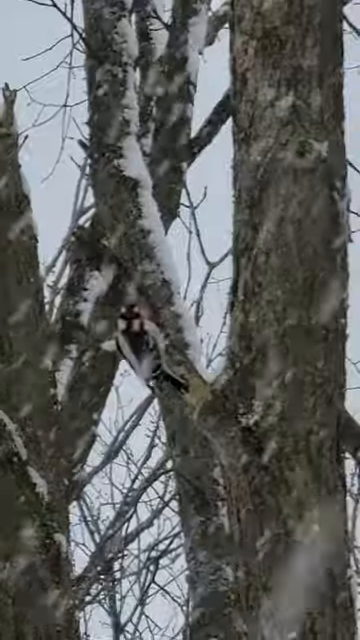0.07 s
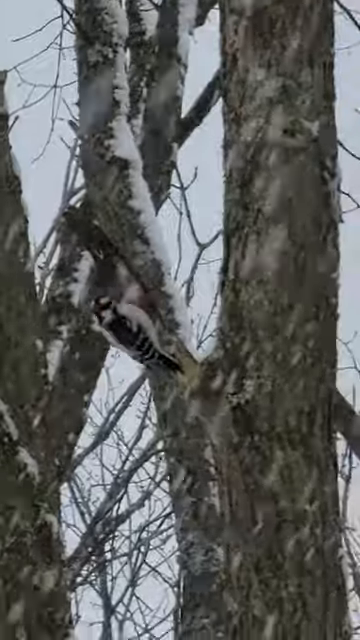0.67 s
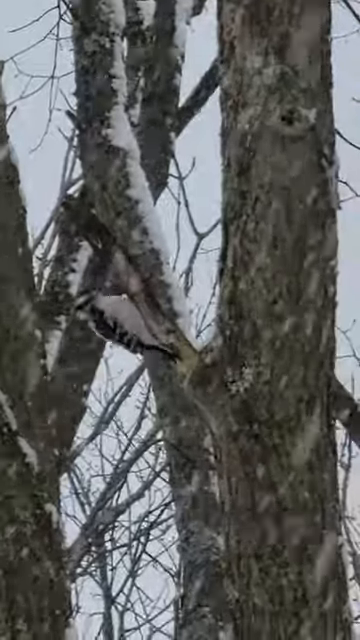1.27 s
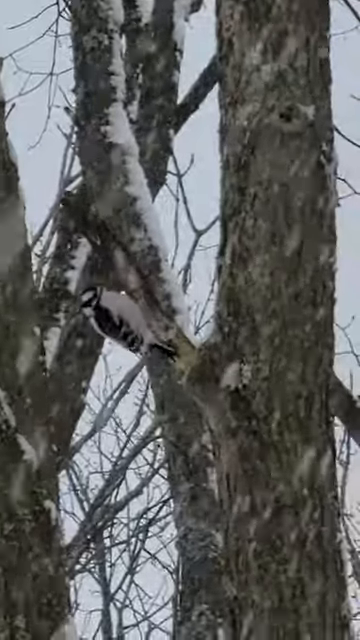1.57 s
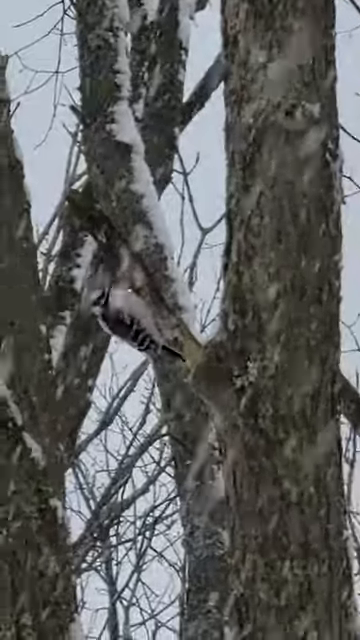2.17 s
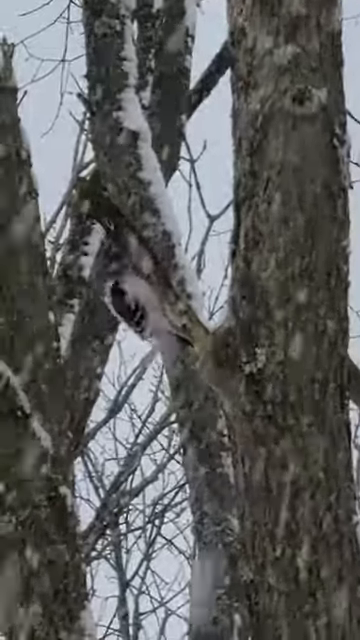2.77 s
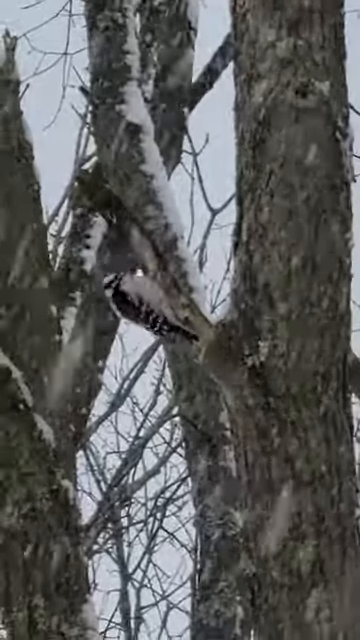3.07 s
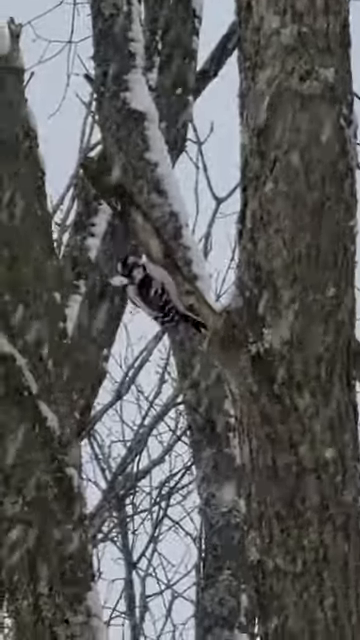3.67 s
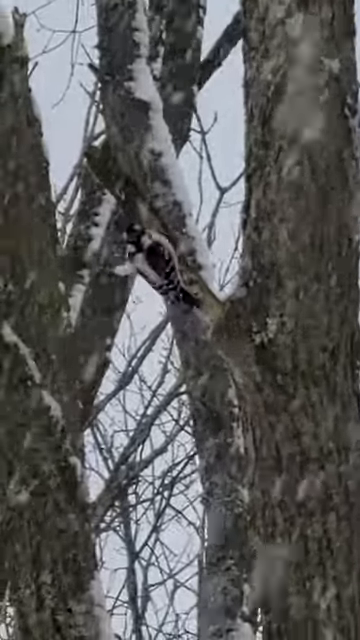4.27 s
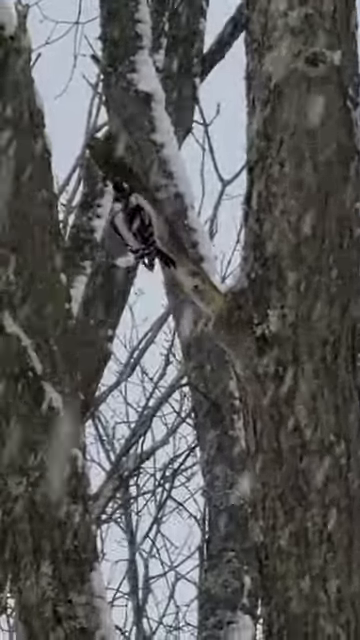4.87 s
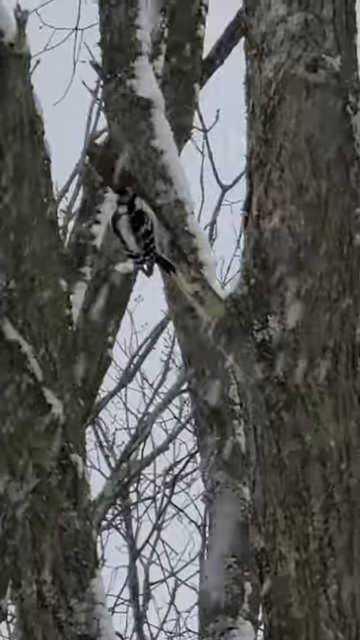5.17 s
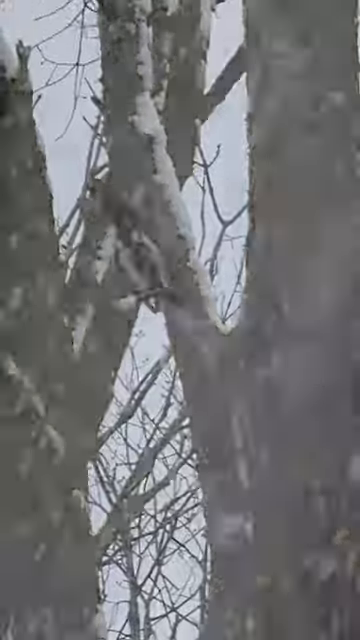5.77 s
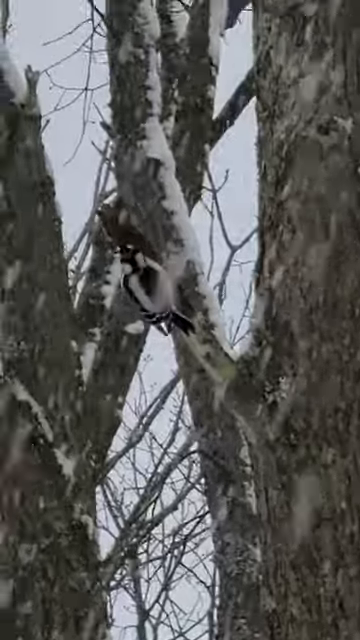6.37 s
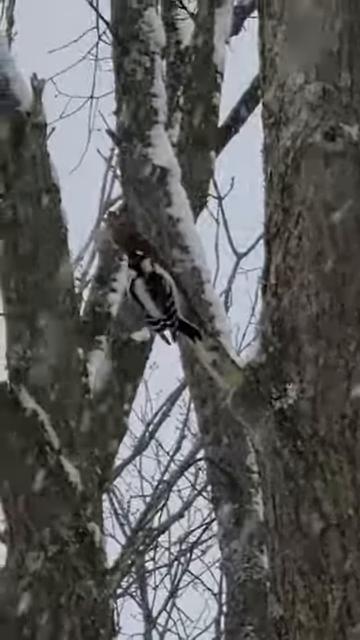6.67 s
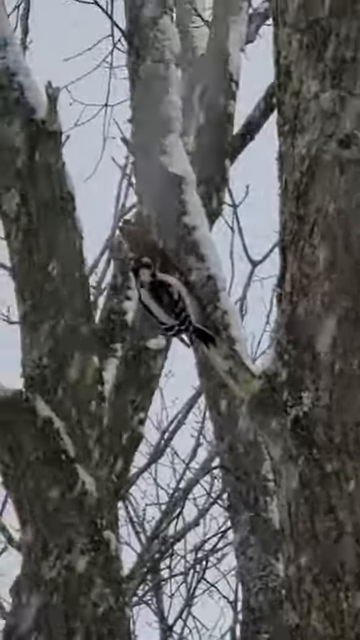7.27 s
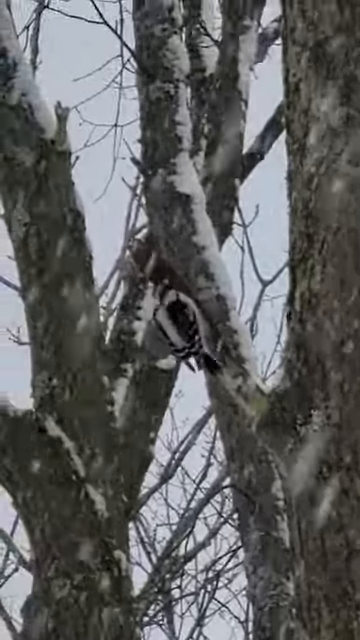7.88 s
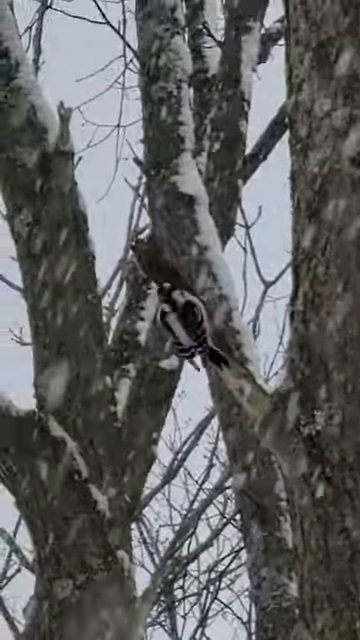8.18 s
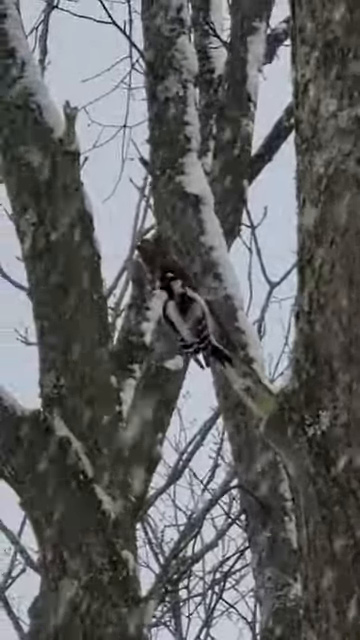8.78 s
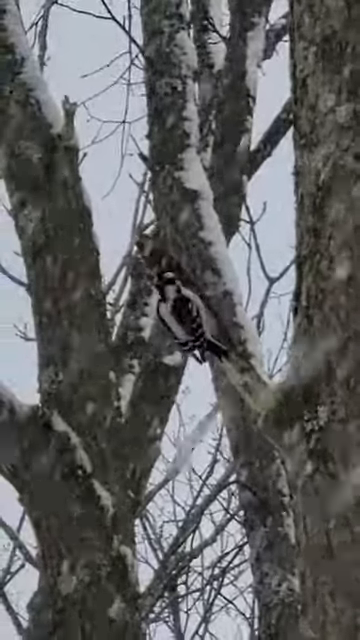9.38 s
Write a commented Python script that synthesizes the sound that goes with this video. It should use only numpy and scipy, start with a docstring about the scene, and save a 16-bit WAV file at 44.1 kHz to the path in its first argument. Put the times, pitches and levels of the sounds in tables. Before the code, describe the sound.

In a quiet snowy wood, wind rumbles on the microphone over a soft hush of air. A small woodpecker knocks unevenly on a dead limb while thin, rising chirps scatter among the trunks. The pecking stops, and distant birds whistle among soft rustles. Snow grains tick on the microphone and one clump bumps it. The breeze grows gustier, claws scratch faintly on bark, and two faint pecks and a last chirp follow.

```python
"""A snowy wood: from the start, wind rumbles on the microphone's ports over a soft hush of air.
Almost at once a small woodpecker knocks on a dead limb, birds give thin, rising chirps that scatter
among the trunks, and snow grains tick on the microphone. From four seconds on, far birds whistle
among soft rustles; at five a clump of snow bumps the casing. The breeze freshens, claws scratch
on bark, and two faint pecks and a last chirp follow as the wind eases."""
import sys
import numpy as np
from scipy import signal
from scipy.fft import rfft, irfft
from scipy.io import wavfile
from scipy.ndimage import uniform_filter1d

SR = 44100
rng = np.random.default_rng(int(sys.argv[2]) if len(sys.argv) > 2 else 0)


def generate_wav(sig):
    """Save sig (samples, or channels by samples) to the path in sys.argv[1] as 16-bit PCM at SR."""
    pcm = np.round(np.clip(np.atleast_2d(sig).T, -1, 1) * 32767).astype(np.int16)
    wavfile.write(sys.argv[1], SR, pcm)


N = 419832
T = np.arange(N) / SR


def undb(db):
    """Decibels to gain."""
    return 10 ** (np.asarray(db) / 20)


def unit(x):
    """Scale to rms 1."""
    return x / np.sqrt(np.mean(x ** 2))


def automation(rows):
    """Join (t/s, value, ..) breakpoints by straight lines, one curve per value column."""
    s, *columns = np.transpose(rows)
    return [np.interp(T, s, column) for column in columns]


def eq(x, points):
    """Shape x with an EQ curve of (f/Hz, gain/dB) points."""
    hz, db = np.transpose(points)
    f = np.maximum(np.fft.rfftfreq(x.shape[-1], 1 / SR), 1)
    return irfft(rfft(x) * undb(np.interp(np.log(f), np.log(hz), db)), x.shape[-1])


def drift(rate_hz, size):
    """Smooth random modulation with a spread near 1."""
    k = max(int(SR / rate_hz), 1)
    held = np.repeat(rng.standard_normal(size // k + 1), k)
    return np.sqrt(2) * uniform_filter1d(uniform_filter1d(held, k), k)[:size]


def add(out, s, sound, pan_db):
    """Mix a sound in at time s; pan is always left minus right."""
    i = max(int(s * SR), 0)
    both = sound * undb(np.array([[pan_db], [-pan_db]]) / 2)
    out[:, i:i + both.shape[1]] += both[:, :N - i]


def decay(t, t60):
    """Exponential decay, 60 dB down after t60."""
    return np.exp(-np.log(1000) * t / t60)


def ring(modes, t, detune, stretch):
    """One decaying sine per mode, with random detuning and polarity at every hit."""
    hz, db, t60 = np.transpose(modes)[:, :, None]
    hz = hz * (1 + detune * rng.standard_normal(hz.shape))
    return undb(db) * decay(t, t60 * stretch) * np.sin(2 * np.pi * hz * t) * rng.choice([-1, 1], hz.shape)


def stereo_noise(correlation):
    """Mid/side white noise; more correlation narrows the image."""
    mid, side = rng.standard_normal((2, N))
    return np.sqrt(1 + correlation) * mid + np.sqrt(1 - correlation) * side * np.array([[1], [-1]])


def off_axis(x, samples):
    """Sound from one side reaches the left port a few samples late."""
    return np.array([np.roll(x[0], samples), x[1]])


def trunks(x, t60, wet_db, lumpy_db, build_s):
    """Reverb return of many trunks: uneven echoes, unrelated left and right, that build and die away."""
    t = np.arange(SR // 2) / SR
    lumps = undb(lumpy_db * np.array([drift(250, len(t)), drift(250, len(t))]))
    echoes = rng.standard_normal((2, len(t))) * lumps
    echoes *= decay(t, t60) * (1 - np.exp(-t / build_s))
    echoes *= undb(wet_db) / np.sqrt(np.sum(echoes ** 2, axis=1, keepdims=True))
    return signal.fftconvolve(x.mean(0)[None], echoes, axes=1)[:, :N]


def rub(half_s, band, grain_db):
    """Grainy noise that swells for half_s and sinks for as long."""
    u = np.linspace(-1, 1, int(2 * half_s * SR))
    noise = unit(eq(rng.standard_normal((2, len(u))), band))
    return noise * undb(grain_db * drift(200, len(u))) * np.cos(np.pi * u / 2) ** 2


# tone of the air bed: f/Hz, gain/dB
HUSH_EQ = [(30, 1.5), (140, -0.5), (250, -3.5), (400, -10.5), (650, -14), (1000, -23), (1600, -29.5),
           (3000, -29), (4500, -39), (7300, -39.5), (8300, -54.5), (10800, -47.5), (12500, -40.5),
           (16000, -42.5)]
# fader ride on the whole bed: t/s, level/dB
HUSH_RIDE = [(0.1, -53.5), (1.4, -54), (3.9, -53), (4.8, -54), (6.1, -53), (7.4, -54), (9.5, -54)]
# trim of the hiss against the murmur: t/s, gain/dB
HISS_TRIM = [(0.1, 0.5), (1.4, 3), (3.9, 1), (4.6, 1), (7, 1), (9.5, 0.5)]


def hush(sway_db=1.0, split_hz=800, hiss_pan_db=-2):
    """Air moving through the bare wood: a deep, centred murmur under a wide, smooth hiss."""
    murmur = signal.sosfilt(signal.butter(2, split_hz, fs=SR, output="sos"), stereo_noise(0.85))
    hiss = signal.sosfilt(signal.butter(2, split_hz, "high", fs=SR, output="sos"), stereo_noise(0.0084))
    murmur *= undb(sway_db * drift(8.2, N))
    hiss *= undb(automation(HISS_TRIM)[0] + np.array([[hiss_pan_db], [-hiss_pan_db]]) / 2)
    bed = unit(eq(off_axis(murmur, samples=12) + hiss, HUSH_EQ))
    return bed * undb(automation(HUSH_RIDE)[0])


# tone of the buffeting: f/Hz, gain/dB
RUMBLE_EQ = [(12, -12.5), (25, -2), (42, -2), (52, 5), (64, 1.5), (80, 1.5), (105, -11), (150, -11.5),
             (200, -39.5), (300, -48), (600, -50.5), (2000, -106)]
# the breeze, with an early lull and freshening later: t/s, level/dB, pan/dB
BREEZE = [(0.1, -48.5, -1), (0.52, -44, -7), (0.72, -52.5, -1), (1.47, -56.5, -2), (1.65, -46.5, 4.5),
          (3.1, -52.5, 13.5), (3.45, -54.5, 18), (4.0, -44.5, 10), (4.45, -49, 4), (5.4, -47, 9),
          (6.35, -42, 9.5), (6.7, -38.5, 1), (7.25, -43.5, -2), (8.25, -40, -3.5), (8.75, -47, -3),
          (9.5, -49.5, 9)]
# gusts riding on the breeze: crest t/s, length/s, lift/dB
GUSTS = [(0.37, 0.037, 11), (3.06, 0.14, 7), (4.196, 0.037, 13), (5.547, 0.085, 8), (5.879, 0.025, 13),
         (6.694, 0.052, 8), (6.843, 0.11, 8.5), (7.376, 0.074, 16.5), (7.561, 0.03, 15.5),
         (7.84, 0.15, 11.5), (8.494, 0.11, 12), (9.206, 0.15, 10)]


def wind(trim_db=1, leveller_s=0.04, deep_hz=105, eddy_db=1.5, upper_share=.45):
    """Eddies buffet each port in their own way; the breeze sets how hard, and gusts lift the lows most."""
    rumble = off_axis(eq(stereo_noise(0.39), RUMBLE_EQ), samples=16)
    # level the turbulence so that its swells follow the gusts
    rumble /= np.sqrt(uniform_filter1d(np.mean(rumble ** 2, axis=0), int(leveller_s * SR)))
    deep = signal.sosfiltfilt(signal.butter(3, deep_hz, fs=SR, output="sos"), rumble)
    breeze_db, pan_db = automation(BREEZE)
    gusts_db = sum(lift_db * np.exp(-(2 * (T - s) / length) ** 2) for s, length, lift_db in GUSTS)
    gusty = deep * undb(gusts_db) + (rumble - deep) * undb(upper_share * gusts_db)
    eddies = np.array([drift(16, N), drift(14, N)])
    return gusty * undb(breeze_db + trim_db + eddy_db * eddies + np.array([pan_db, -pan_db]) / 2)


# modes of the dead limb, before each hit weights and stretches them: f/Hz, level/dB, t60/s
LIMB_MODES = [(551, -4, 0.073), (712, -17.5, 0.11), (960, -9, 0.017), (1180, -2.5, 0.02), (1307, -9, 0.04),
              (1405, -6, 0.088), (1940, -3.5, 0.028), (2395, -4, 0.065), (2610, -11, 0.022),
              (2790, -3.5, 0.032), (3160, -7.5, 0.024), (4100, -12, 0.026), (5260, -9, 0.0085)]
# beak hits: t/s, thud/dB, hollow knock/dB, bark/dB, splinter/dB, ring stretch/factor, favoured f/Hz
PECKS = [(0.3615, -55, -74, -71.5, -70, 1.2, 2800), (0.497, -56.5, -70.5, -73.5, -64, 1.4, 1960),
         (0.621, -54, -62.5, -63.5, -74, 0.67, 2850), (0.992, -67, -67, -76, -60, 0.72, 1160),
         (1.1162, -65, -67.5, -70.5, -70, 0.78, 734), (1.2332, -67, -68.5, -72.5, -64, .7, 1960),
         (1.344, -63.5, -71, -74, -72, 0.58, 2780), (1.847, -61, -67.5, -70.5, -74, 0.95, 1960),
         (2.086, -61, -61.5, -68.5, -70, 0.89, 1390), (2.337, -61, -67, -72, -56, 0.69, 1160),
         (2.537, -57, -67, -73, -68, 0.83, 2400), (2.782, -55.5, -60.5, -63.5, -68, 1.05, 1340),
         (3.61, -56.5, -68, -73, -63, 1.05, 1960), (3.851, -60, -72, -74.5, -68, 0.68, 2400),
         (4.133, -60, -73, -75, -74, 1.8, 1960), (8.122, -71, -78, -71, -65.5, 0.9, 1960),
         (8.23, -68, -76, -74.5, -72, 1.3, 1980)]


def pecks(ring_db=13, crack_db=5.5, crumbs_db=-24, contact_s=0.00013, spot_db=5, spot_width_hz=150):
    """Each hit rings the limb and cracks bark; the spot struck sets which modes speak and for how long."""
    out, t = np.zeros((2, N)), np.arange(SR // 5) / SR
    zones_hz, modes_hz = [556, 1400, 1950, 2800, 5000], np.array(LIMB_MODES)[:, 0]
    attack = 1 - np.exp(-t / contact_s)  # soft, rotten wood yields for a moment under the beak
    crack = undb(crack_db) * (decay(t, t60=.022) + undb(crumbs_db) * decay(t, t60=.13))
    for s, thud_db, knock_db, bark_db, splinter_db, stretch, spot_hz in PECKS:
        zones_db = [thud_db, knock_db, bark_db, bark_db, splinter_db]
        favoured_db = spot_db * np.exp(-((modes_hz - spot_hz) / spot_width_hz) ** 2)
        modes_db = np.interp(np.log(modes_hz), np.log(zones_hz), zones_db) + favoured_db + ring_db
        wood = undb(modes_db) @ ring(LIMB_MODES, t, detune=.014, stretch=stretch)
        top_end = [(6500, splinter_db + 5), (9000, splinter_db - 10)]
        bark = eq(rng.standard_normal((2, len(t))), [(150, thud_db), *zip(zones_hz, zones_db), *top_end])
        add(out, s, attack * (wood + bark * crack), pan_db=-4.5)
    return off_axis(out, samples=2) + trunks(out, t60=0.25, wet_db=-7, lumpy_db=3, build_s=0.0013)


# pitch and level envelope of a chirp's rise: time/share of rise, pitch/share of span, gain/dB
CHIRP_SHAPE = [(0, 0, -7), (.14, .34, -2), (.4, .56, -3), (.64, .79, -3), (.83, .88, -5), (.93, .96, -8),
               (1, 1, -11)]
# tone of what the trunks send back: f/Hz, gain/dB
ECHO_EQ = [(5500, 7.5), (7000, -3.5), (8300, -1), (12000, 8), (16000, -7)]
# chirp cues: t/s, rise/s, start f/Hz, top f/Hz, level/dB, swell/dB, overtone/dB, echo send/dB, pan/dB
CHIRPS = [(0.5103, 0.047, 5660, 8270, -48.5, 9.5, -18, -2, 14),
          (1.0192, 0.043, 5400, 7880, -46.5, 18, -16, -6.5, 9.5),
          (2.2255, 0.045, 5660, 8120, -37.5, 7, -17, -14, 0.5),
          (2.716, 0.036, 5400, 7420, -66.5, -3, -22, -5, 0),
          (3.461, 0.047, 5380, 8090, -41.5, 10.5, -8, -8.5, -8),
          (5.67, 0.035, 5220, 7280, -52, -9, -28, -22.5, -6),
          (8.9853, 0.032, 5340, 7270, -55, -6, -41, -17.5, -3)]


def chirps(flick_s=0.0073, flick_hz=2150, flick_db=-8, attack_s=0.0022,
           waver=0.0073, flutter_db=1.0, rasp_db=-25, overtone_swell_db=4):
    """A slightly raspy whistle leaps up, climbs more slowly, then flicks down as the syrinx lets go."""
    out, send = np.zeros((2, 2, N))
    when, climb, contour_db = np.transpose(CHIRP_SHAPE)
    for s, rise, start_hz, top_hz, db, swell_db, overtone_db, send_db, pan_db in CHIRPS:
        t = np.arange(int((rise + flick_s) * SR)) / SR
        up, down = np.minimum(t / rise, 1), np.maximum(t - rise, 0) / flick_s
        hz = start_hz + (top_hz - start_hz) * np.interp(up, when, climb) - flick_hz * down
        phase = 2 * np.pi * np.cumsum(hz * (1 + waver * drift(370, len(t)))) / SR
        gate = np.clip(t / attack_s, 0, 1) * np.clip((1 - down) * 4, 0, 1)
        envelope_db = np.interp(up, when, contour_db) + swell_db * (t / rise - .5) + flick_db * down
        gain = undb(db + envelope_db + flutter_db * drift(206, len(t)))
        rasp = 1 + undb(rasp_db) * drift(600, len(t))
        overtone = undb(overtone_db + overtone_swell_db * (up - 1)) * np.sin(2 * phase)
        note = np.sqrt(2) * gate * gain * rasp * (np.sin(phase) + overtone)
        add(out, s, note, pan_db)
        add(send, s, note * undb(send_db), pan_db=0)  # a bird farther off or facing away is wetter
    twigs = trunks(out, t60=0.12, wet_db=-11.5, lumpy_db=2, build_s=0.005)
    wood = trunks(eq(send, ECHO_EQ), t60=0.4, wet_db=1.0, lumpy_db=5, build_s=.014)
    return off_axis(out, samples=7) + twigs + wood


# tone of the casing's dull knock: f/Hz, gain/dB
CASING_EQ = [(200, -35.5), (800, 13), (1400, 1.5), (1950, 20.5), (2400, 10.5), (3400, 15), (5000, -1),
             (7200, 3), (8500, -39), (16000, -55)]
# tone of a grain's sizzle: f/Hz, gain/dB
SIZZLE_EQ = [(1000, -8), (4000, -13), (7000, -10), (9500, -10), (12500, 1), (15000, -1), (17000, -36.5)]
# larger grains hitting the microphone: t/s, knock/dB, sizzle/dB, pan/dB, ring f/Hz
GRAINS = [(0.772, -76, -76, -4, 2800), (2.364, -70.5, -62, -11, 2010), (2.5515, -72, -63, -10, 1700),
          (5.3045, -65.5, -43.5, 0.5, 1850), (5.5157, -84, -69, -10, 2000), (5.6174, -62.5, -58, -4, 2000),
          (6.1609, -77, -72, -17, 2780), (6.4214, -75.5, -75, -12, 3200), (6.5225, -73, -68, -9, 1400),
          (7.168, -73, -90, -1, 2780), (7.6104, -84, -66, 9, 2800), (7.8203, -81, -65, -13, 2800),
          (8.0465, -73, -64, -10, 3500), (8.1052, -76, -69, -5, 2100), (8.5358, -76, -68, -9.5, 2800),
          (8.561, -78, -73, -8, 3400), (8.705, -77, -78, -7, 2800), (8.766, -74, -76, -5, 2600),
          (9.293, -74, -69, -9, 2200), (9.4015, -77, -72, -8, 4800), (9.509, -74, -76, -6, 2300)]


def snow_grains(knock_trim_db=15, sizzle_trim_db=19, fine_db=-90, fine_count=45, landing_s=.0005):
    """Icy grains snap on the casing and crumble; finer ones land at random between them."""
    out, t = np.zeros((2, N)), np.arange(SR // 8) / SR
    fine = [(when * N / SR, fine_db + 8 * weight, fine_db + 12 * bite ** 2, 10 * (side - .5), 2800)
            for when, weight, bite, side in rng.random((fine_count, 4))]
    for s, knock_db, sizzle_db, pan_db, ring_hz in [*GRAINS, *fine]:
        crumbs = undb(-26 + 1.5 * drift(900, len(t))) * decay(t, t60=.18)  # a quiet, uneven trickle
        force = rng.standard_normal((2, len(t))) * (1 - np.exp(-t / landing_s))
        knock = eq(force * (decay(t, t60=.011) + crumbs), CASING_EQ)
        knock = eq(knock, [(ring_hz * 0.88, 0), (ring_hz, 4), (ring_hz * 1.7, 0)])  # the spot rings
        sizzle = eq(force * (decay(t, t60=.0045) + crumbs), SIZZLE_EQ)
        grain = undb(knock_db + knock_trim_db) * knock + undb(sizzle_db + sizzle_trim_db) * sizzle
        add(out, s, grain * (1 - t / t[-1]), pan_db)
    return out


# distant whistles, one glide a row: t/s, length/s, start f/Hz, middle f/Hz, end f/Hz, level/dB, dry/dB
WHISTLES = [(4.061, 0.11, 924, 924, 957, -63.5, -2), (4.112, 0.12, 5500, 4180, 3720, -72, -6),
            (4.215, 0.025, 3680, 2940, 2170, -58, -5), (5.978, 0.024, 2370, 2440, 2680, -68, -1),
            (5.994, 0.037, 2920, 2665, 2500, -60, -1), (6.041, 0.018, 3680, 3380, 3380, -64, 0),
            (6.06, 0.033, 1930, 2580, 2840, -62.5, -0.5), (6.111, 0.029, 3440, 3390, 3410, -63, -1),
            (6.118, .03, 3210, 2930, 2820, -66, 0), (8.04, 0.13, 3690, 3660, 3770, -70, -3),
            (8.06, .035, 3630, 3200, 3450, -69, -3), (9.088, 0.053, 5650, 5140, 4300, -80, -3),
            (9.314, 0.015, 3180, 3300, 3300, -71, 0)]


def far_birds(waver=0.013):
    """Slurred whistles from far off, blurred by their echoes; some birds are hidden behind trunks."""
    send, direct = np.zeros((2, 2, N))
    for s, length, start_hz, middle_hz, end_hz, db, dry_db in WHISTLES:
        u = np.linspace(0, 1, int(length * SR))
        hz = np.interp(u, [0, .5, 1], [start_hz, middle_hz, end_hz]) * (1 + waver * drift(500, len(u)))
        envelope = undb(db) * np.sqrt(np.abs(np.sin(np.pi * u)))
        note = envelope * np.sin(2 * np.pi * np.cumsum(hz) / SR)
        add(send, s, note, pan_db=0)
        add(direct, s, undb(dry_db) * note, pan_db=-2)
    early = trunks(send, t60=0.051, wet_db=-5, lumpy_db=5, build_s=0.0028)
    tail = trunks(send, t60=0.25, wet_db=-1, lumpy_db=3.5, build_s=0.0076)
    return direct + early + tail


# background rustles: crest t/s, half length/s, band f/Hz, level/dB
RUSTLES = [(4.708, 0.26, 1550, -69), (5.294, 0.19, 1510, -64), (6.019, 0.17, 1360, -65.5),
           (6.758, 0.24, 1480, -67.5), (8.745, 0.09, 2400, -83)]


def rustles():
    """Soft, diffuse rustles swell and sink some way off."""
    out = np.zeros((2, N))
    for s, half_s, hz, db in RUSTLES:
        band = [(hz * 0.56, -30), (hz * 0.64, 0), (hz, -2), (hz * 1.96, -11),
                (hz * 3.4, -30), (hz * 6, -50)]
        add(out, s - half_s, undb(db) * rub(half_s, band, grain_db=1), pan_db=-2)
    return out


# low modes of the casing: f/Hz, level/dB, t60/s
CASING_MODES = [(94, 8.5, 0.073), (240, -10, .025), (415, 3, 0.016), (780, -5, 0.021), (1170, -16, .016)]


def snow_clump(at_s=5.0038, thump_db=-47.5, snap_db=-53.5):
    """A heavier clump of snow lands on the casing: a crisp snap layered over a dull thump."""
    out, t = np.zeros((2, N)), np.arange(SR // 10) / SR
    thump = ring(CASING_MODES, t, detune=.01, stretch=1.0).sum(0)
    burst = rng.standard_normal((2, len(t))) * decay(t, t60=0.0064)
    snap = eq(burst, [(1000, 11), (4000, 1), (7000, -7), (9500, -19), (12500, 4), (16000, -5)])
    add(out, at_s, undb(thump_db) * thump + undb(snap_db) * snap * (1 - t / t[-1]), pan_db=20)
    return out


# claw scrapes: crest t/s, half length/s, level/dB
SCRATCHES = [(7.355, 0.05, -66.5), (8.731, 0.13, -80), (9.276, .08, -74)]


def claws():
    """Claws scrape briefly over the bark, and the trunks add a tail."""
    out = np.zeros((2, N))
    band = [(1000, -25), (1900, -1), (2700, -2), (3300, -13), (4700, -17), (7000, -37)]
    for s, half_s, db in SCRATCHES:
        add(out, s - half_s, undb(db) * rub(half_s, band, grain_db=1.5), pan_db=-4)
    return out + trunks(out, t60=0.5, wet_db=-1, lumpy_db=0, build_s=.01)


def scene():
    """The mix: a bed of air and wind under the birds, snow and rustles."""
    bed = hush() + wind()
    return bed + pecks() + chirps() + snow_grains() + far_birds() + rustles() + snow_clump() + claws()


def record(dry):
    """The master: a moment of silence, a quick fade-in and a steep high cut."""
    start_s, fade_s, cutoff_hz = .068, .01, 15850
    fade_in = np.clip((T - start_s) / fade_s, 0, 1)
    return signal.sosfilt(signal.ellip(10, .2, 70, cutoff_hz, fs=SR, output="sos"), dry * fade_in)


dry = scene()
out = record(dry)
generate_wav(out)
```